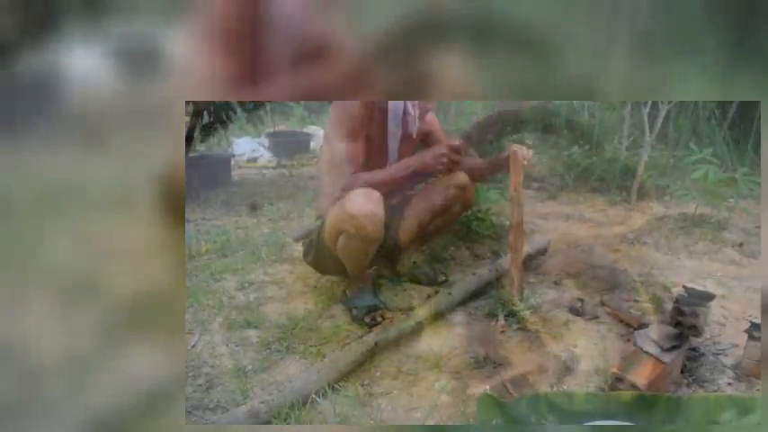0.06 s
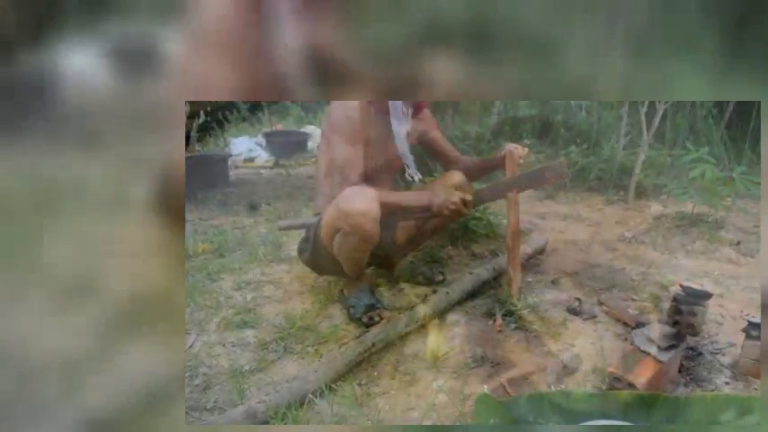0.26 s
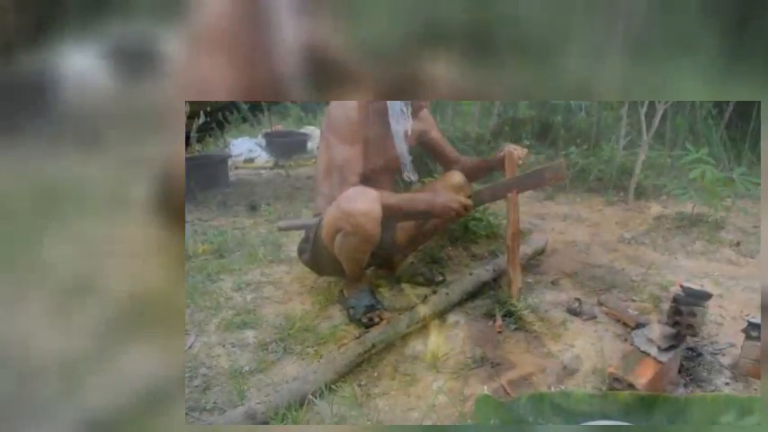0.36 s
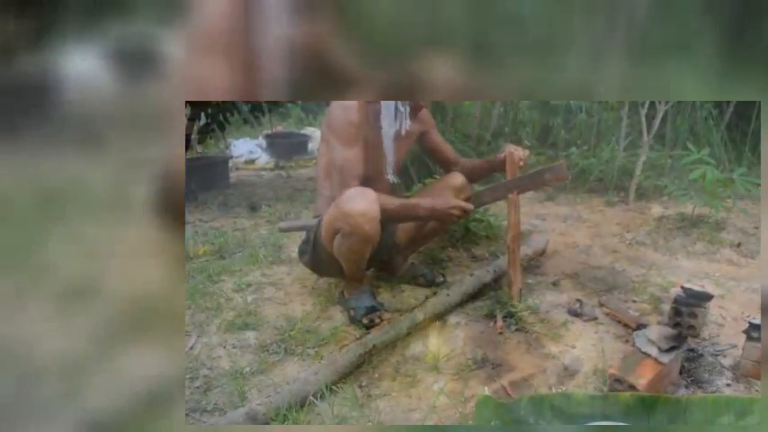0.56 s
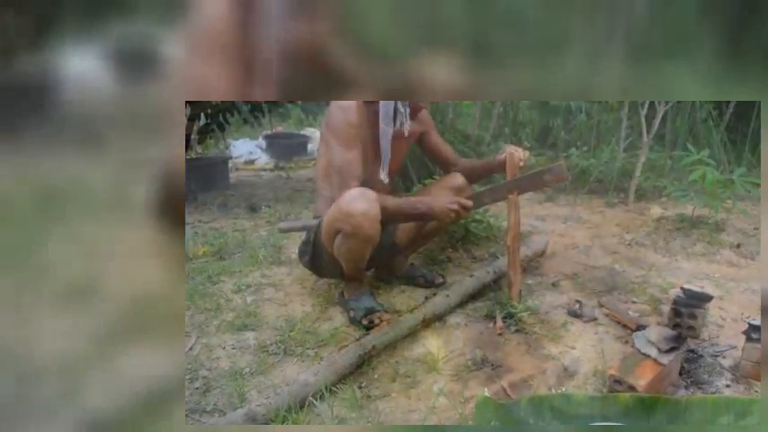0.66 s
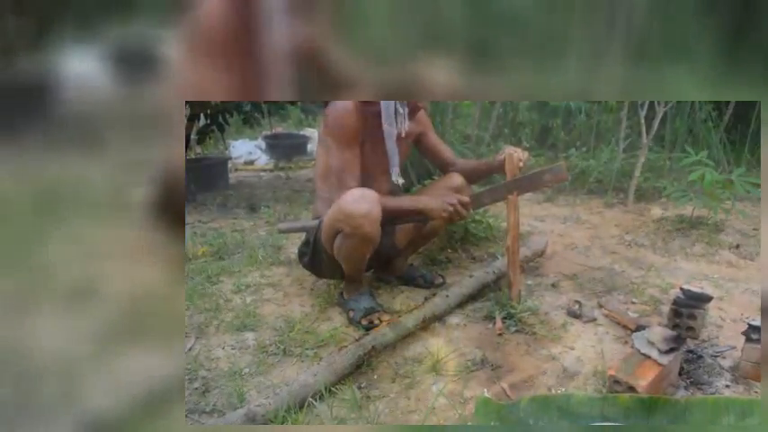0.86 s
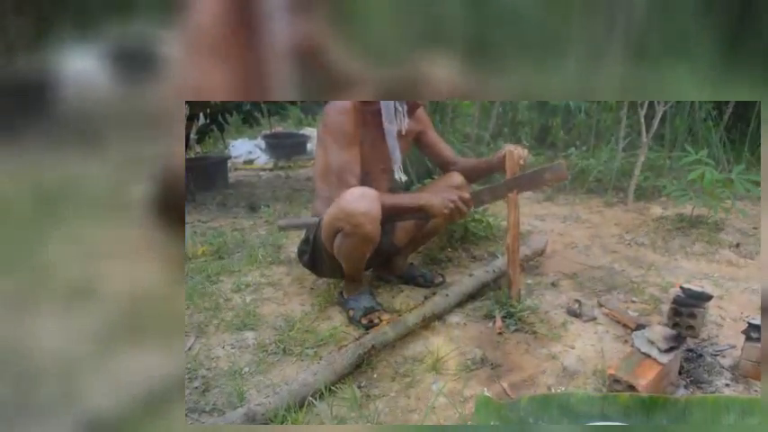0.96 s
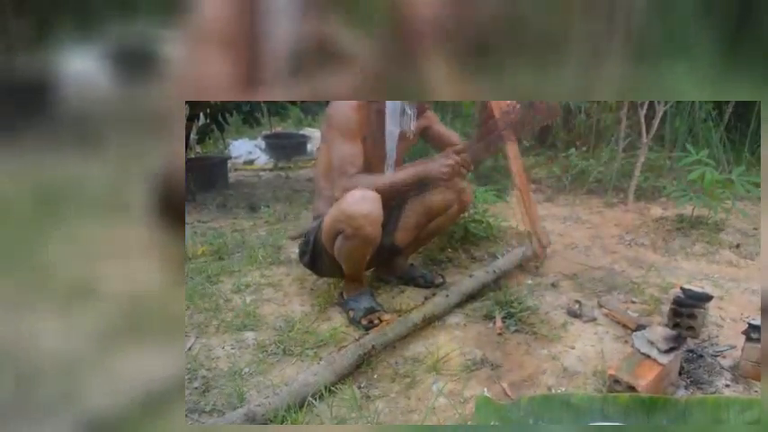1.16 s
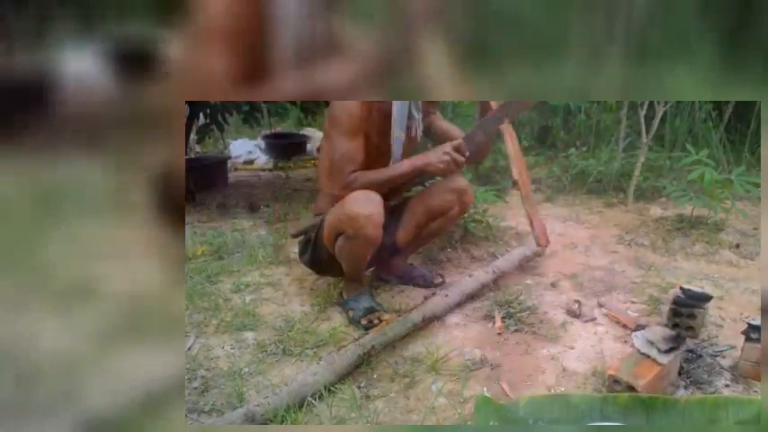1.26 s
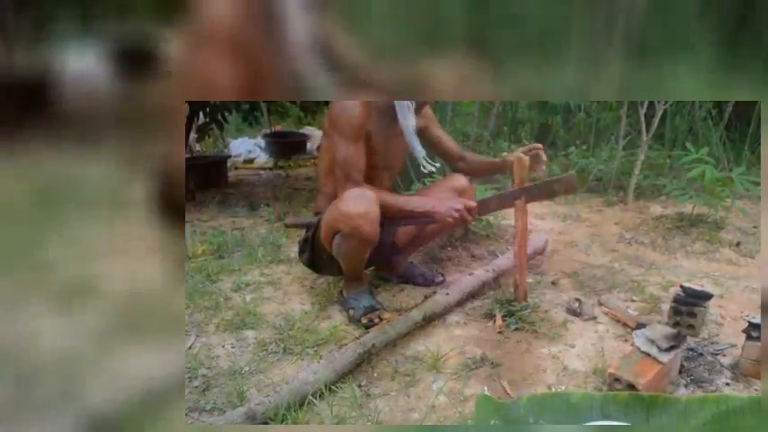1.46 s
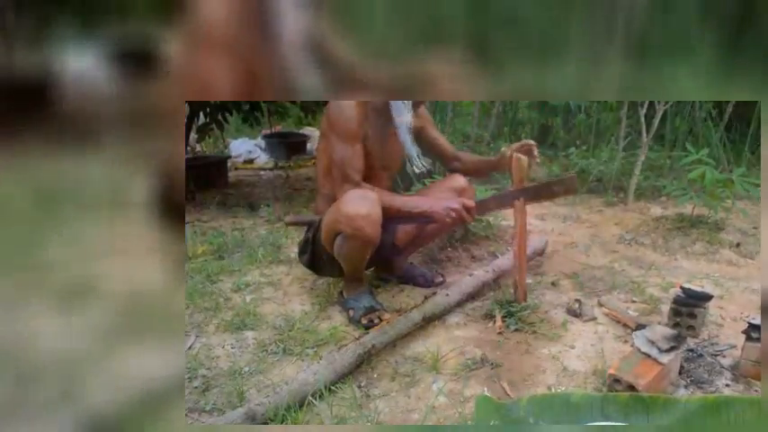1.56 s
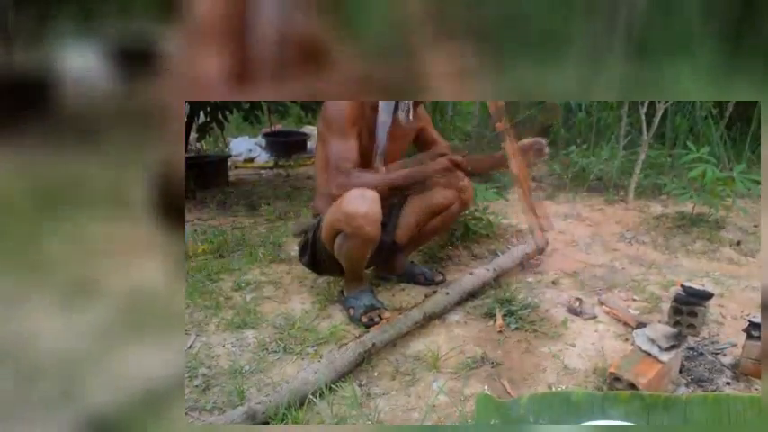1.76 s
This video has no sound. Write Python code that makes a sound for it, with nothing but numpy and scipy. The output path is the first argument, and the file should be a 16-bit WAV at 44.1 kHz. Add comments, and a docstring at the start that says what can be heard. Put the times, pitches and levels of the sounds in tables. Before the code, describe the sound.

Two crisp wood-splitting blade strokes, each followed by small wooden clacks, over faint insects and low rumble

```python
"""Blade splitting a stick

A long blade splits a stick twice outdoors: noise of very uneven size makes the dense crackle of tearing fibres,
decaying modes ring the steel briefly, and short sines thud in the ground. Band-passed noise bursts tick as
splinters, paired resonances knock as loose wood, and crackling noise in two bands rustles as dry grass.
Insects sing in throbbing narrow bands over air noise, a distant low rumble and a faint tone. One microphone."""
import sys
import numpy as np
from scipy import signal
from scipy.fft import rfft, irfft
from scipy.io import wavfile
from scipy.ndimage import uniform_filter1d

SR = 44100
rng = np.random.default_rng(int(sys.argv[2]) if len(sys.argv) > 2 else 0)


def pcm_store(signal):
    """Save signal as 16-bit PCM."""
    levels = np.round(np.clip(np.atleast_2d(signal), -1, 1) * 32767)
    wavfile.write(sys.argv[1], SR, levels.astype(np.int16).T)


def gain_from_db(level_db):
    """Convert decibel levels to linear amplitude factors (20 dB per decade)."""
    decades = np.asarray(level_db, float) / 20
    return 10 ** decades


N = 79380  # length in samples

# spectral tilt of the open air: f/Hz, relative gain/dB
AIR_COLOUR = [(88, -21), (150, -8), (376, -11), (612, -10), (1340, -29), (1830, -21.5), (5460, -22),
              (6770, -25.5), (7320, -28.5), (9430, -19), (16000, -36.5)]
# spectral shape of the distant rumble: f/Hz, relative gain/dB
RUMBLE_COLOUR = [(15, -36), (25, -25.5), (48, -3), (64, 6), (102, -4), (135, -3.5), (204, -20.5),
                 (251, -15), (300, -17.5), (390, -43), (660, -120)]
AIR_DB, RUMBLE_DB = -55.5, -44.5  # rms levels
# insect song bands: f/Hz, width of each filter pass/Hz, level before throb/dB, rms throb/dB, throb rate/Hz
INSECT_BANDS = [(6717, 280, -58, 1, 28), (9400, 990, -60.5, 1.2, 120)]
# path of a faint low tone far off, before its wander: t/s, f/Hz, level/dB
FAR_TONE = [(.68, 262, -69), (.74, 249, -46.5), (.85, 260.2, -53.5), (.9, 260.4, -60), (1.0, 266, -65),
            (1.06, 270, -93)]
# dry grass rustle, before its flicker: t/s, bright level/dB, dull level/dB
GRASS_RUSTLE = [(0, -52, -56.5), (.12, -51.5, -53.5), (.3, -56.5, -54.5), (.45, -58, -60),
                (.52, -48.5, -56.5), (.6, -52.5, -49.5), (.68, -55, -51), (.76, -51.5, -55.5),
                (.83, -56.5, -51.5), (.95, -56, -56), (1.06, -49.5, -56.5), (1.14, -55, -54),
                (1.28, -62, -61), (1.35, -47.5, -57.5), (1.39, -56, -51.5), (1.6, -58, -58),
                (1.7, -56, -54.5), (1.8, -63, -58)]
# splinter ticks: t/s, level/dB, centre f/Hz, width of each filter pass/Hz, t60/s
SPLINTER_TICKS = [(.1166, -39.5, 9260, 5050, 0.036), (0.179, -38.5, 6040, 8950, 0.033),
                  (.2668, -24, 6200, 1500, .018), (.2675, -28, 11300, 3000, 0.011),
                  (0.487, -46, 2980, 6000, 0.12), (0.5513, -39, 6200, 4000, 0.038),
                  (.61, -62, 3000, 5000, 0.017), (1.059, -37, 9900, 7000, 0.025),
                  (1.087, -36.5, 6000, 6000, 0.014), (1.112, -36.5, 4630, 8340, 0.04),
                  (1.351, -45.5, 6500, 8240, 0.095), (1.399, -44, 3045, 4930, 0.032),
                  (1.4115, -35, 10000, 1800, .025), (1.4452, -20, 10000, 1500, .014),
                  (0.583, -42.5, 10500, 3000, 0.027), (1.657, -64, 5000, 8000, 0.017),
                  (1.682, -42.5, 8500, 6000, 0.014), (1.743, -42, 9800, 6000, 0.015)]
TICK_RISE_SHARE = .02  # rise time as a share of the tick's t60
# loose wood knocks: t/s, level/dB, main f/Hz, second f/Hz, second relative level/dB, rattle relative level/dB
WOOD_KNOCKS = [(.180, -33.5, 540, 1030, 2.5, -12), (0.5754, -17.5, 594, 347, -10.5, -19.5),
               (0.602, -35, 566, 1520, -2, -3), (.610, -44, 910, 1520, 10, -4),
               (1.659, -29, 555, 2040, -2.5, -3), (1.7146, -35, 520, 1800, -2, -3),
               (1.7203, -24, 403, 1760, 3, -7.5), (1.7283, -35, 624, 1870, 6, 4.5),
               (1.74, -44, 494, 1350, -4, 3), (1.748, -41.5, 606, 2000, 4, 2),
               (1.756, -34.5, 565, 1900, -2, -8)]
KNOCK_RISE_S, KNOCK_T60_S, KNOCK_SECOND_T60_S = .0002, .019, .0087  # the rise is a time constant
# blade strokes: t/s, level/dB, rise/s, hold/s, fall t60/s
BLADE_BLOWS = [(.2168, -11.5, .0032, .007, .014), (1.4329, -9, .0014, .001, .02)]
# colour of the tearing and its echo, one list per blow: f/Hz, relative gain/dB
TEARING_COLOURS = [
    [(200, -62), (350, -13), (800, -14.5), (1800, -7), (2600, -13.5), (4500, -5.5), (7600, -9),
     (10000, -1.5), (12000, -3.5), (13500, -17), (16000, -13)],
    [(200, -57), (350, -26), (1000, -18.5), (2800, -15), (3800, -16.5), (5200, -5), (7500, -7.5),
     (8600, -9), (10000, -1.5), (12300, -14), (16000, -9)],
]
# ringing modes of the steel: f/Hz, first-jolt level in blow one/dB, the same in blow two/dB, t60/s
BLADE_MODES = [(2050, -16, -32, .02), (3040, -17, -26, .035), (4330, -17, -32, .028), (5020, -26, -13, .03),
               (5420, -18, -21, .03), (6000, -19, -34, .03), (6310, -30, -17, .028), (8150, -23, -19, .022),
               (8960, -21, -34, .03), (9710, -15, -15, .03), (10250, -19, -24, .025),
               (11100, -17, -21, .025), (11900, -19, -21, .02)]
JOLTS, JOLT_FALL_DB = 4, 3  # jolts that shake the blade while it bites, each weaker
# scattered echo from the trees, one row per blow: level/dB, t60/s
TREE_ECHOES = [(-24.5, 0.18), (-23, 0.15)]
# ground thuds under the blows: t/s, level/dB, f/Hz, t60/s
GROUND_THUDS = [(0.221, -15.5, 196, 0.041), (.221, -28.5, 140.4, 0.15), (0.232, -26, 1020, 0.03),
                (1.428, -17, 110, .1), (1.439, -23.5, 243, 0.055)]
# wood rolling on after its knock: start t/s, end t/s, level/dB, f/Hz, width of first filter pass/Hz
WOOD_ROLLS = [(0.575, .612, -40.5, 490, 453), (1.744, 1.763, -56, 606, 710)]
# splitting scrape before the second blow, ahead of its band-pass: t/s, level/dB
SPLITTING_SCRAPE = [(1.4105, -64), (1.4125, -34.5), (1.425, -34.5), (1.428, -21.5), (1.4335, -22),
                    (1.436, -78)]
# treble roll-off of the microphone: f/Hz, relative gain/dB
MIC_COLOUR = [(100, 0), (12000, 0), (14000, -2.5), (15500, -4)]
TOP_HZ = 15750  # upper edge of the finished band, cut steeply by a low-pass


def curve(rows, col):
    """One column of a time table, joined by straight lines."""
    rows = np.array(rows, float)
    return np.interp(np.arange(N) / SR, rows[:, 0], rows[:, col])


def unit(x):
    """Scale to rms 1."""
    return x / np.sqrt(np.mean(x ** 2))


def colour(x, points):
    """Minimum-phase filter shaped by (f/Hz, gain/dB) points, scaled to keep the level of white noise."""
    points = np.array(points, float)
    hz = np.fft.rfftfreq(8192, 1 / SR)
    gain_db = np.interp(np.log(hz + 1), np.log(points[:, 0]), points[:, 1])
    cepstrum = irfft(np.log(gain_from_db(gain_db)))
    cepstrum[1:4096] *= 2  # folding the cepstrum forward makes the filter causal
    cepstrum[4097:] = 0
    h = irfft(np.exp(rfft(cepstrum)))[:4096]
    return signal.fftconvolve(x, h / np.sqrt(np.sum(h ** 2)))[:len(x)]


def band(x, hz, width):
    """Resonant band-pass."""
    q = max(hz / width, .3)
    return signal.lfilter(*signal.iirpeak(min(hz, .45 * SR), q, fs=SR), x)


def double_band(x, hz, width):
    """The same resonant band-pass twice, for steeper sides."""
    return band(band(x, hz, width), hz, width)


def ring(x, hz, t60):
    """One decaying mode driven by x."""
    pole = np.exp(2j * np.pi * hz / SR - np.log(1000) / (t60 * SR))
    return signal.lfilter([1], [1, -pole], x).imag


def fade(t, t60):
    """Decay by 60 dB in t60, silent before 0."""
    return (t >= 0) * gain_from_db(-60 * np.maximum(t, 0) / t60)


def grit(spread_db, size):
    """Noise whose samples differ widely in size: crackle."""
    noise = rng.standard_normal(size)
    boost_db = spread_db * np.minimum(rng.exponential(size=size), 6)
    return unit(noise * gain_from_db(boost_db))


def walk(rate):
    """Random levels held 1 / rate s and slewed twice, rms 1."""
    k = int(SR / rate)
    steps = np.repeat(rng.standard_normal(N // k + 1), k)
    return unit(uniform_filter1d(uniform_filter1d(steps, k), k)[:N])


def air():
    """Steady broadband noise of the open air."""
    return gain_from_db(AIR_DB) * unit(colour(rng.standard_normal(N), AIR_COLOUR))


def rumble():
    """Distant rumble: steady noise shaped to the lows."""
    return gain_from_db(RUMBLE_DB) * unit(colour(rng.standard_normal(N), RUMBLE_COLOUR))


def insects():
    """Insect song: bands of noise with a random throb in level."""
    out = np.zeros(N)
    for hz, width, db, throb_db, rate in INSECT_BANDS:
        song = unit(double_band(rng.standard_normal(N), hz, width))
        out += song * gain_from_db(db + throb_db * walk(rate))
    return out


def far_tone():
    """A faint sine whose pitch and level wander about their set paths."""
    hz = curve(FAR_TONE, 1) + 3.4 * walk(35)
    tone = np.sin(2 * np.pi * np.cumsum(hz) / SR)
    return tone * gain_from_db(curve(FAR_TONE, 2) + 1.5 * walk(23.1))


def rustle():
    """Dry grass: dense tiny crackles in a bright and a dull band, each flickering in level."""
    bright = unit(double_band(grit(3.8, size=N), 8000, 9100))
    bright *= gain_from_db(curve(GRASS_RUSTLE, 1) + 1.95 * walk(59.95))
    dull = unit(double_band(grit(3.93, size=N), 1140, 2150))
    dull *= gain_from_db(curve(GRASS_RUSTLE, 2) + 2 * walk(39.46))
    return bright + dull


def ticks():
    """Snapping splinters: short bursts of band-passed crackle."""
    out, t = np.zeros(N), np.arange(4000) / SR
    for s, db, hz, width, t60 in SPLINTER_TICKS:
        i = int(s * SR)
        rise = np.clip(t / t60 / TICK_RISE_SHARE, 0, 1)
        burst = double_band(grit(.79, size=len(t)) * fade(t, t60) * rise, hz, width)
        burst /= np.sqrt(np.sum(burst ** 2) / (t60 * SR / 14))  # t60 / 14: time constant of the energy
        out[i:i + len(t)] += (gain_from_db(db) * burst)[:N - i]
    return out


def knocks():
    """Loose wood: a short push rings two resonances and a noisy rattle."""
    out, t = np.zeros(N), np.arange(3000) / SR
    push = 1 - np.exp(-t / KNOCK_RISE_S)
    for s, db, main_hz, second_hz, second_db, rattle_db in WOOD_KNOCKS:
        i = int(s * SR)
        main = np.sin(2 * np.pi * main_hz * t) * fade(t, KNOCK_T60_S)
        second = np.sin(2 * np.pi * second_hz * t) * fade(t, KNOCK_SECOND_T60_S)
        rattle = unit(band(band(grit(2, size=len(t)), 1500, 3000), 1500, 4000)) * fade(t, .016)
        knock = main + gain_from_db(second_db) * second + gain_from_db(rattle_db) * rattle
        out[i:i + len(t)] += (gain_from_db(db) * push * knock)[:N - i]
    return out


def tearing(t, k):
    """Fibres tear in blow k: dense coloured crackle that rises, holds and falls."""
    s, db, rise, hold, t60 = BLADE_BLOWS[k]
    swell = np.clip((t - s) / rise, 0, 1) ** 2
    fall = fade(np.maximum(t - s - rise - hold, 0), t60)
    return colour(grit(2.5, size=N) * swell * fall * gain_from_db(db), TEARING_COLOURS[k])


def blade_ring(k):
    """Steel rings in blow k: a few weakening jolts drive each decaying mode of the blade."""
    out = np.zeros(N)
    s, _, rise, hold, _ = BLADE_BLOWS[k]
    order = np.arange(JOLTS)
    times = s + .7 * rise + hold * rng.random((len(BLADE_MODES), JOLTS)) * order / JOLTS
    times = times + rng.random((len(BLADE_MODES), 1)) * rise / 2  # each mode starts at its own moment
    for (hz, *mode_db, t60), mode_times in zip(BLADE_MODES, times):
        jolts = np.zeros(N)
        jolts[(mode_times * SR).astype(int)] = gain_from_db(mode_db[k] - JOLT_FALL_DB * order)
        out += ring(jolts, hz, t60)
    return out


def tree_echo(t, k):
    """The trees scatter the crack of blow k back as decaying noise of the same colour."""
    s, _, rise, _, _ = BLADE_BLOWS[k]
    db, t60 = TREE_ECHOES[k]
    return colour(rng.standard_normal(N) * fade(t - s - rise, t60) * gain_from_db(db), TEARING_COLOURS[k])


def thuds(t):
    """The ground thuds: decaying sines that swell in over one cycle."""
    out = np.zeros(N)
    for s, db, hz, t60 in GROUND_THUDS:
        swell = np.clip((t - s) * hz, 0, 1)
        out += gain_from_db(db) * np.sin(2 * np.pi * hz * (t - s)) * fade(t - s, t60) * swell
    return out


def rolls(t):
    """Pieces of wood roll on: crackle in a low band, softly gated."""
    out = np.zeros(N)
    for start, end, db, hz, width in WOOD_ROLLS:
        gate = uniform_filter1d(1. * (t > start) * (t < end), size=200)
        out += gain_from_db(db) * gate * unit(band(band(grit(1.4, size=N), hz, width), hz, 2 * width))
    return out


def scrape(t):
    """Splitting scrape: a brief broad band of fine crackle."""
    gate = (t > SPLITTING_SCRAPE[0][0]) * (t < SPLITTING_SCRAPE[-1][0])
    crackle = grit(.95, size=N) * gain_from_db(curve(SPLITTING_SCRAPE, 1)) * gate
    return band(band(crackle, 7200, 10000), 5600, 14500)


def scene():
    """All sources reach one microphone, fed to two equal channels."""
    t = np.arange(N) / SR
    blows = np.zeros(N)
    for k in range(len(BLADE_BLOWS)):
        blows += tearing(t, k) + blade_ring(k) + tree_echo(t, k)
    blows += thuds(t) + scrape(t)
    wood = ticks() + knocks() + rolls(t)
    background = rustle() + air() + rumble() + insects() + far_tone()
    mono = blows + wood + background
    return np.array([mono, mono])


def roll_off(x):
    """The treble ends steeply here."""
    return signal.sosfilt(signal.butter(12, 16130, fs=SR, output="sos"), x)


def record(dry):
    """The microphone dulls the top, peaks beyond full scale clip, and a steep low-pass cuts the top."""
    mic = np.clip([colour(channel, MIC_COLOUR) for channel in dry], -1, 1)
    low_pass = signal.ellip(10, .2, 60, TOP_HZ, fs=SR, output="sos")
    return roll_off(signal.sosfilt(low_pass, mic))


dry = scene()
out = record(dry)
pcm_store(out)
```